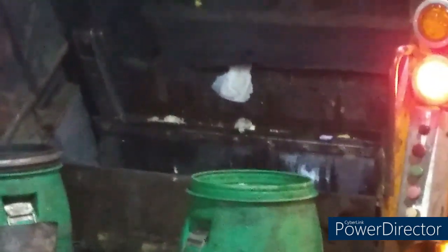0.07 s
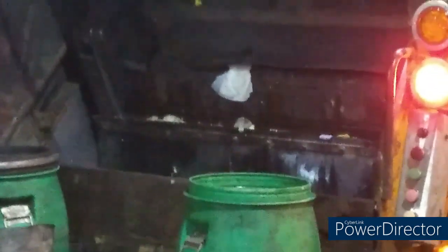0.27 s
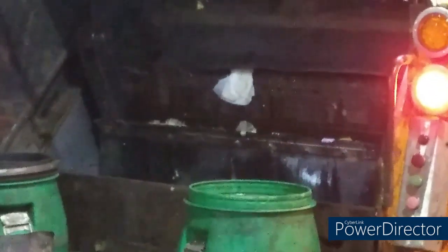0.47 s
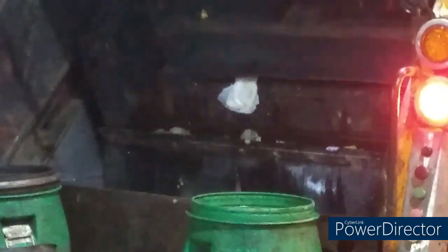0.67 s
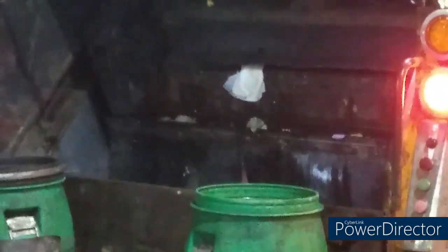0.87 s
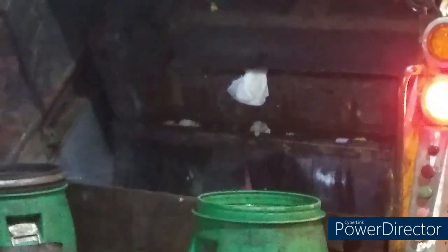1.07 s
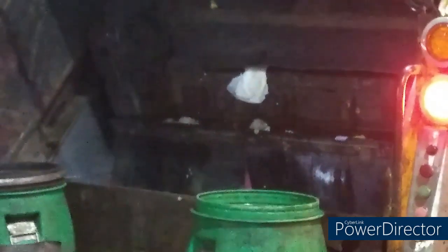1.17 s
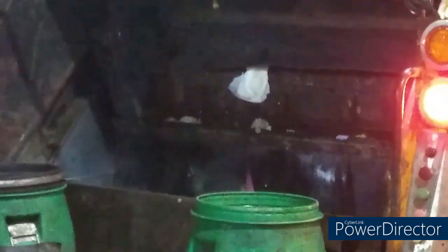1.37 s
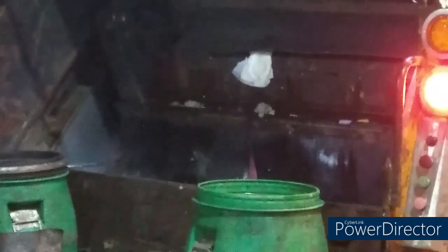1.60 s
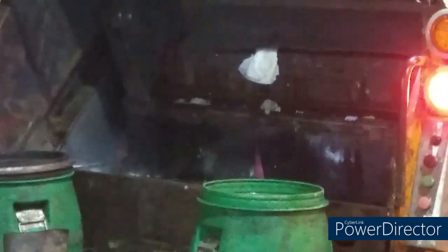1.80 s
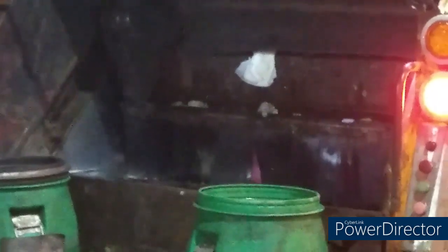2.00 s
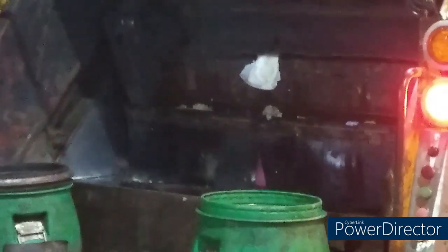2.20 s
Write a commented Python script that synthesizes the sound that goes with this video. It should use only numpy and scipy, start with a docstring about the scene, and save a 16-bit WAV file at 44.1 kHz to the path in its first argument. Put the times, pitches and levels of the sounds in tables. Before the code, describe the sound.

One loud steel bang rings through a refuse truck's hopper and echoes in the street, led by a short hiss and squeak. The nearby engine keeps droning under a growing pump whine, soft scraping and a final crackling snap.

```python
"""Close behind a refuse truck in a street, its engine running fast to drive the packer.
A short hiss from a valve and a squeak of rubbing steel lead into one hard bang of the packer blade.
The bang rings through the steel hopper, echoes in the street and briefly turns the recorder down.
The engine drones on, the pump whines louder as it takes load, and the blade scrapes softly.
Near the end something in the load snaps and crackles."""
import sys
import numpy as np
from scipy import signal
from scipy.fft import rfft, irfft
from scipy.io import wavfile
from scipy.ndimage import uniform_filter1d

SR = 44100
rng = np.random.default_rng(int(sys.argv[2]) if len(sys.argv) > 2 else 0)


def transcribe(u):
    """Save the signal u as a 16-bit wav file named by the first command-line argument.

    u: samples, shape (n,) or (channels, n), limited to [-1, 1]; the rate is SR.
    q: integer samples, one column per channel.
    """
    v = np.clip(np.atleast_2d(u).T, -1, 1)
    q = np.round(v * 32767).astype(np.int16)
    wavfile.write(sys.argv[1], SR, q)


N = 99225
T = np.arange(N) / SR
FREQS = np.arange(N // 2 + 1) * SR / N
SIDES = np.array([[1], [-1]])   # left, right

# engine tones, and pump whine at full load: (multiple of the engine's cycle rate, level [dB])
ENGINE_TONES = [(3, -65), (4, -74), (6, -57.5), (8, -42.5), (10, -59), (11, -57.5), (16, -49), (21, -59.5),
                (24, -59.5)]
PUMP_TONES = [(32, -54.5), (40, -53)]
# how alike the left and right sides are: (frequency [Hz], likeness [1 = the same])
USUAL_LIKENESS = [(60, 0.86), (200, 1), (500, 0.4), (1200, 0.54), (2500, 0.34), (5000, 0.24), (12000, 0.06)]
BANG_LIKENESS = [(200, 0.82), (500, 0.56), (1200, 0.61), (2500, 0.53), (5000, 0.54), (12000, 0.16)]

# the colour of each noise, from bass to treble: (frequency [Hz], relative level [dB per Hz])
RUMBLE_COLOUR = [(30, -14), (45, -4), (90, -3), (190, -2.5), (280, -7.5), (420, -9), (700, -8.5),
                 (1050, -13.5), (1500, -9.5), (2300, -13), (3600, -25), (6000, -26.5), (10000, -32.5),
                 (14000, -48)]
HISS_COLOUR = [(1000, -8), (2300, -0.5), (3600, -29), (5400, -6), (6400, 6), (7600, 1), (9300, -1.5),
               (12000, -13), (14300, -24), (15500, -45)]
NUDGE_COLOUR = [(150, -9), (300, -14), (780, 10), (1100, -10), (1350, 0.5), (2000, -10), (4000, -28.5)]
CRACK_COLOUR = [(500, -15), (1300, -4), (2400, 8), (3800, -29), (6500, -12), (10000, -13), (14000, -23),
                (16000, -42)]
BOOM_COLOUR = [(160, -11), (220, -2.5), (300, 1.5), (500, -2.5), (780, -2), (1100, -5), (1700, -6),
               (2300, -9), (3600, -26.5), (6000, -17), (10000, -23.5), (14000, -40), (16000, -57)]
ECHO_COLOUR = [(150, -7), (300, -5), (700, 5.5), (1300, -12), (2200, -14), (3600, -41), (6000, -35),
               (12000, -53)]
REBOUND_COLOUR = [(220, -8), (310, 2), (400, 0), (560, -8), (800, -11.5), (1300, -19), (3000, -40),
                  (8000, -60)]
SCRAPE_COLOUR = [(400, 2), (1000, -5), (1700, 3), (2500, 2.5), (3600, -8.5), (5000, -8.5), (7000, -19),
                 (11000, -24.5), (15000, -40)]
RASP_COLOUR = [(1200, -4), (2400, 1), (3500, 2), (4600, 2), (5900, 5), (7000, -29), (11000, -19),
               (15000, -32)]
CRACKLE_COLOUR = [(120, -25), (280, -1), (700, 4), (1050, -5), (2200, 2.5), (4200, -12.5), (6500, -10),
                  (9500, -9), (11000, -26), (13500, -10), (15500, -23)]

# A fade time is how long a sound takes to drop by 60 dB.
# bursts of noise: (time [s], level [dB], rise time [s], fade time [s])
HISSES = [(.12, -36, 0.0041, 0.19), (.29, -37.5, 0.03, 0.18)]
NUDGES = [(.137, -38.5, .003, 0.83), (.205, -27, 0.0015, 0.024)]
REBOUNDS = [(.279, -19, 0.0028, .3)]
CRACKLES = [(2.207, -37.5, 0.021, 0.94)]
# the path of the squeak: (time [s], pitch [Hz], level [dB])
SQUEAK_PATH = [(.124, 747.6, -51), (.138, 748, -35), (.148, 647, -39), (0.159, 600, -33.5),
               (0.177, 620, -43), (.2, 574, -68)]
# the blade strikes and chatters: (time after the bang starts [s], relative level [dB])
BLADE_BLOWS = [(0, 6.5), (.007, -0.5), (.013, -6), (.0215, -7)]
# notes of the struck edge and the hopper walls: (pitch [Hz], relative level [dB], fade time [s])
EDGE_NOTES = [(2100, -4, 0.022), (2660, -11, 0.0096), (6630, -7, 0.016), (10000, -12.5, .004)]
WALL_NOTES = [(216, -4, 0.55), (286, -6, 0.43), (305, 2, 0.41), (327, -2, .44), (365, 1, 0.56),
              (391, -1, 0.47), (444, -7.5, .48), (493, -2.5, 0.49), (524, 2.5, .39), (571, 4, 0.29),
              (618, -0.5, 0.4), (680, -2, 0.44), (751, -5, 0.5), (788, -1, 0.3), (807, -7, .36),
              (860, 0, 0.29), (940, -9, 0.36), (1092, -4, 0.17), (1192, -13, 0.27), (1305, -16.5, 0.64),
              (1950, -12, 0.25), (2097, -2, .18)]
# how long the steel plates ring: (frequency [Hz], fade time [s])
BOOM_FADES = [(200, 0.42), (400, 0.65), (800, 0.4), (1500, 0.29), (2500, 0.24), (6000, 0.28), (14000, 0.16)]
# the blade scrapes over the load: (middle time [s], half length [s], level [dB])
SCRAPES = [(1.183, 0.084, -45), (1.276, 0.015, -46.5), (1.413, 0.031, -47), (1.487, 0.031, -45.5),
           (1.66, 0.031, -49), (2.095, 0.066, -56)]
# peaks and dips of the microphone openings: (frequency [Hz], gain [dB], sharpness [Q])
LEFT_PORT = [(6190, 12.5, 3.47), (8240, -21.5, 2.15)]
RIGHT_PORT = [(7740, -20, 4.03), (8960, 8, 5.3), (4770, -1, 0.33)]

ENGINE_CYCLE_HZ = 14.05
PUMP_LOAD_S, PUMP_RISE_S, PUMP_IDLE_DB = 0.96, 0.17, -6.5
BANG_S, BANG_RISE_S, PUSH_LENGTH_S = 0.2171, 0.0038, 0.001323
SNAP_S, SNAP_HZ = 2.217, 2450
LIMIT_DB, RECOVERY_DB_PER_S, LIMIT_SMOOTH_S = -11, 43, 0.002


def from_db(db):
    """Turn decibels into a number to multiply by."""
    return 10 ** (np.asarray(db) / 20)


def at_hz(table, hz):
    """Read between a table's rows, giving each octave equal room."""
    freqs, values = np.transpose(table)
    return np.interp(np.log(hz), np.log(freqs), values)


def drift(hz):
    """A random wobble of typical size 1, mostly slower than hz."""
    wobble = irfft(rfft(rng.standard_normal(N)) / (1 + (FREQS / hz) ** 2), N)
    return wobble / np.sqrt(np.mean(wobble ** 2) + 1e-20)


def noise(colour, shape=None, likeness=USUAL_LIKENESS):
    """Stereo noise of power 1; shape(hz), if given, then sets each band's loudness over time."""
    shared, opposed = rfft(rng.standard_normal((2, N)))
    hz = FREQS + 1
    alike = at_hz(likeness, hz)
    gain = from_db(at_hz(colour, hz)) / np.sqrt(1 + (colour[0][0] / hz) ** 6)   # cut below row one
    spectrum = gain * (np.sqrt(1 + alike) * shared + np.sqrt(1 - alike) * opposed * SIDES)
    spectrum /= np.std(irfft(spectrum, N))
    if shape is None:
        return irfft(spectrum, N)
    band = np.floor(3 * np.log2(np.clip(FREQS, 100, SR) / 100))   # three bands per octave
    return sum(irfft(spectrum * (band == k), N) * shape(100 * 2 ** ((k + .5) / 3)) for k in range(23))


def burst(start_s, rise_s, fade_s):
    """A loudness curve: a straight rise, then a fade."""
    rise = np.clip((T - start_s) / rise_s, 0, 1)
    return rise * from_db(-60 * np.maximum(T - start_s - rise_s, 0) / fade_s)


def noise_bursts(rows, colour):
    """Noise that rises and fades once for each row."""
    return noise(colour) * sum(from_db(db) * burst(s, rise, fade) for s, db, rise, fade in rows)


def swell(middle_s, half_s, db):
    """A smooth, bell-shaped loudness curve."""
    return from_db(db) * np.exp(-((T - middle_s) / half_s) ** 2 / 2)


def click(time_s):
    """A single sample of height 1."""
    return 1.0 * (np.arange(N) == int(time_s * SR))


def ring(x, hz, fade_s):
    """Each click in x starts a pure note that fades away."""
    decay, step = from_db(-60 / (fade_s * SR)), 2 * np.pi * hz / SR
    return signal.lfilter([0, np.sin(step)], [1, -2 * decay * np.cos(step), decay ** 2], x + 1e-18)


def only(x, side, hz, order=4):
    """Let through the "low" or "high" side of a frequency."""
    return signal.sosfilt(signal.butter(order, hz, side, fs=SR, output="sos"), x)


def placed(x, left_leads_s, left_louder_db):
    """Move a sound sideways: one ear hears it sooner, and one louder."""
    shift = np.exp(1j * np.pi * FREQS * left_leads_s * SIDES)
    return irfft(rfft(x) * shift, N) * from_db(left_louder_db * SIDES / 2)


def fluttering_tones(table, phase):
    """Tones locked to the engine's turning, each wavering in loudness."""
    return sum(from_db(db) * np.sqrt(2) * (1 + 0.25 * drift(29))
               * np.sin(multiple * phase + rng.uniform(0, 2 * np.pi)) for multiple, db in table)


def engine():
    """Engine drone and hydraulic pump whine, over a rumble whose treble throbs with the firings."""
    cycle_hz = ENGINE_CYCLE_HZ * (1 + 0.0049 * drift(2.83))
    phase = 2 * np.pi * np.cumsum(cycle_hz) / SR
    drone = fluttering_tones(ENGINE_TONES, phase)
    load = np.clip((T - PUMP_LOAD_S) / PUMP_RISE_S, 0, 1)
    whine = from_db(PUMP_IDLE_DB * (1 - load)) * fluttering_tones(PUMP_TONES, phase)
    throb = 0.13 * np.cos(4 * phase)   # four firings per cycle
    rumble = noise(RUMBLE_COLOUR, lambda hz: from_db(drift(17)) * (1 + throb * (hz > 800)))
    return placed(drone + whine + from_db(-43) * rumble, left_leads_s=0.0002, left_louder_db=0.86)


def hiss():
    """Air or oil spurts through a valve twice."""
    return noise_bursts(HISSES, HISS_COLOUR)


def squeak():
    """Steel rubbing under load makes a rough, falling tone with a faint octave above."""
    times, hz, db = np.transpose(SQUEAK_PATH)
    rough_hz = np.interp(T, times, hz) * (1 + 0.028 * drift(196))
    phase = 2 * np.pi * np.cumsum(rough_hz) / SR
    tone = np.sin(phase) + from_db(-17.5) * np.sin(2 * phase)
    loudness = from_db(np.interp(T, times, db)) * (T > times[0]) * (T < times[-1])
    return loudness * np.sqrt(2) * tone


def nudges():
    """Soft knocks as the blade takes up its slack."""
    return noise_bursts(NUDGES, NUDGE_COLOUR)


def air_push():
    """Each blow of the blade pushes the air, then pulls it back."""
    waves = np.zeros(N)
    for delay_s, db in BLADE_BLOWS:
        progress = (T - BANG_S - delay_s) / PUSH_LENGTH_S
        waves += from_db(db) * (1 - 2 * progress) * (progress >= 0) * (progress < 1)
    return from_db(3) * only(waves, "low", hz=2760)


def wall_ring():
    """The struck hopper walls ring with many wavering notes."""
    notes = np.zeros(N)
    for hz, db, fade_s in WALL_NOTES:
        sign = rng.choice([-1, 1])
        flutter = 1 + 0.35 * drift(22)
        notes += sign * from_db(db) * flutter * ring(click(BANG_S), hz, fade_s)
    return from_db(-14.5) * notes * np.clip((T - BANG_S) / BANG_RISE_S, 0, 1)


def edge_crack():
    """The struck edge gives a sharp crack and a very short ring."""
    crack = from_db(-4) * noise(CRACK_COLOUR) * burst(BANG_S, rise_s=0.0003, fade_s=0.009)
    return crack + sum(from_db(db) * ring(click(BANG_S), hz, fade) for hz, db, fade in EDGE_NOTES)


def plate_boom():
    """The steel plates ring with so many notes that they blur into noise."""
    boom = noise(BOOM_COLOUR, lambda hz: burst(BANG_S, BANG_RISE_S, at_hz(BOOM_FADES, hz)), BANG_LIKENESS)
    return from_db(-9) * boom


def street_echo():
    """The street throws the bang back as a soft wash of noise."""
    return from_db(-25) * noise(ECHO_COLOUR) * burst(BANG_S, rise_s=0.064, fade_s=0.69)


def bang():
    """The blade hits the hopper: all five parts together, with the deep bass cut."""
    whole = air_push() + wall_ring() + edge_crack() + plate_boom() + street_echo()
    return placed(only(whole, "high", hz=211), left_leads_s=-0.00004, left_louder_db=0.8)


def rebound():
    """The blade bounces on the hopper with a dull thud."""
    return noise_bursts(REBOUNDS, REBOUND_COLOUR)


def scrapes():
    """The blade drags over the load in grainy swells, and catches harder once."""
    rubbing = sum(swell(*row) for row in SCRAPES) * noise(SCRAPE_COLOUR)
    rasp = swell(middle_s=1.267, half_s=0.024, db=-45) * noise(RASP_COLOUR)
    grain = from_db(2.5 * drift(90))
    return placed((rubbing + rasp) * grain, left_leads_s=0.000476, left_louder_db=-0.3)


def snap():
    """Something in the load breaks: a very short ping on the left, and a crackle that lingers."""
    ping = click(SNAP_S)
    for _ in range(2):   # ringing twice softens the start
        ping = ring(ping, SNAP_HZ, fade_s=0.00205)
    ping = only(ping, "high", hz=1700, order=3)
    ping = ping / np.abs(ping).max() * from_db(-20 + 7 * SIDES)
    crackle = noise_bursts(CRACKLES, CRACKLE_COLOUR) * from_db(2 * drift(300))
    return ping + crackle


def scene():
    """Everything as it arrives behind the hopper."""
    return engine() + hiss() + squeak() + nudges() + bang() + rebound() + scrapes() + snap()


def microphone_port(x, peaks):
    """The small opening over a microphone boosts some frequencies and weakens others."""
    for hz, db, q in peaks:
        gain, step = from_db(db / 2), 2 * np.pi * hz / SR
        width, middle = np.sin(step) / (2 * q), -2 * np.cos(step)
        x = signal.lfilter([1 + width * gain, middle, 1 - width * gain],
                           [1 + width / gain, middle, 1 - width / gain], x)
    return x


def gain_control(x):
    """The recorder turns itself down fast when the sound is too loud, then slowly back up."""
    power = uniform_filter1d(np.mean(x ** 2, axis=0), size=400)
    over_db = np.maximum(10 * np.log10(np.maximum(power, 1e-12)) - LIMIT_DB, 0)
    recovery_db = RECOVERY_DB_PER_S * T
    cut_db = np.maximum.accumulate(over_db + recovery_db) - recovery_db
    smooth = np.exp(-1 / (LIMIT_SMOOTH_S * SR))
    return x * from_db(-signal.lfilter([1 - smooth], [1, -smooth], cut_db))


def record(dry):
    """Two microphones and the gain control, then rounded peaks and a cut of the highest treble."""
    x = np.array([microphone_port(dry[0], LEFT_PORT), microphone_port(dry[1], RIGHT_PORT)])
    x = gain_control(x)
    x = x / (1 + x ** 6) ** (1 / 6)
    return signal.sosfilt(signal.cheby2(16, 70, 16500, fs=SR, output="sos"), x)


dry = scene()
out = record(dry)
transcribe(out)
```